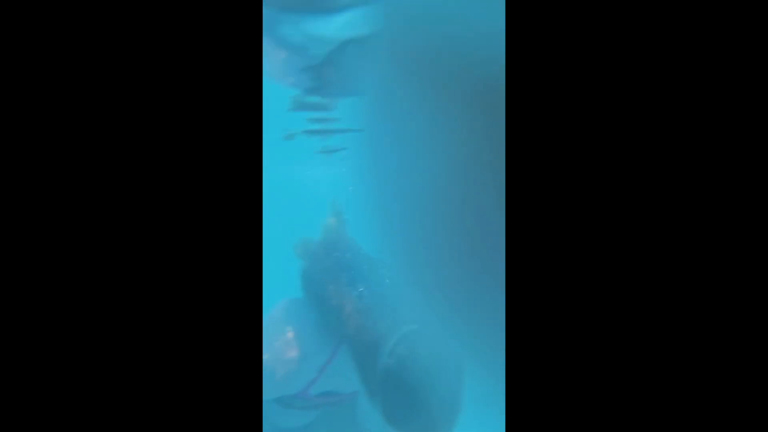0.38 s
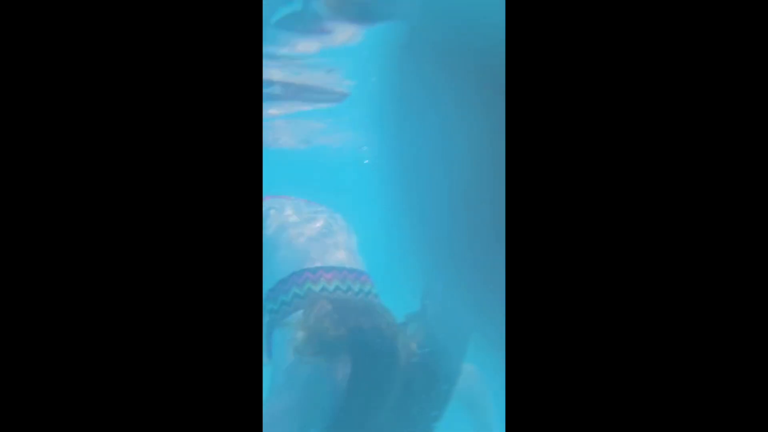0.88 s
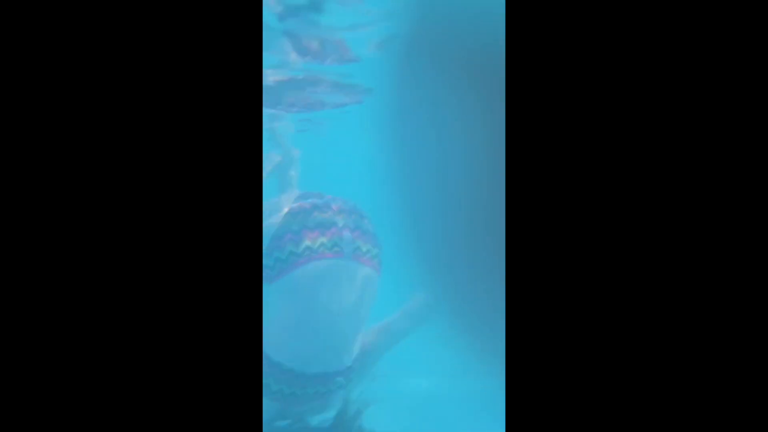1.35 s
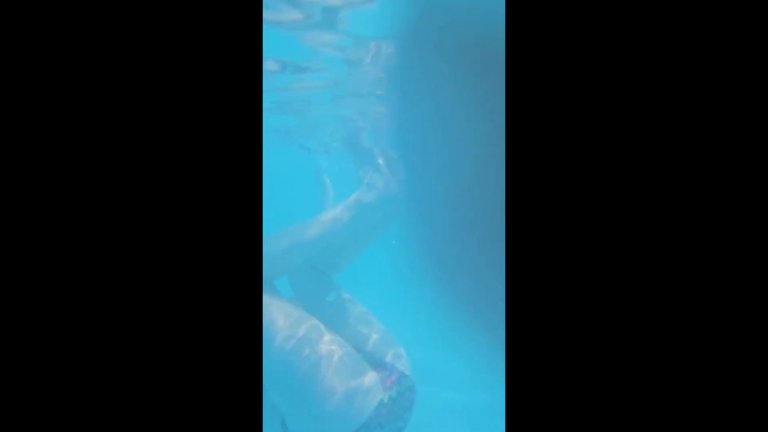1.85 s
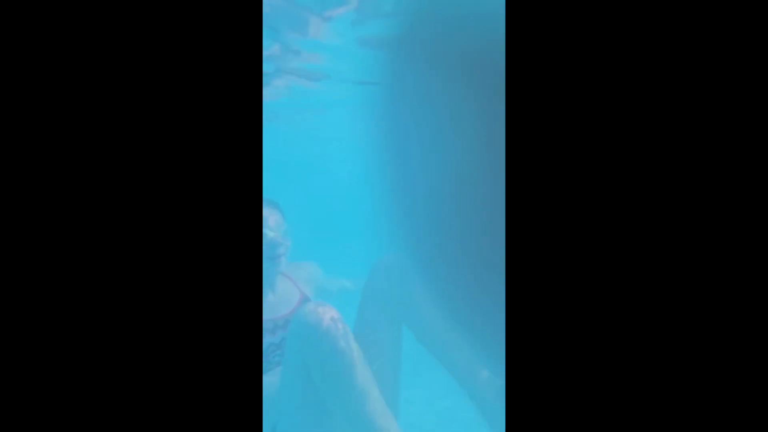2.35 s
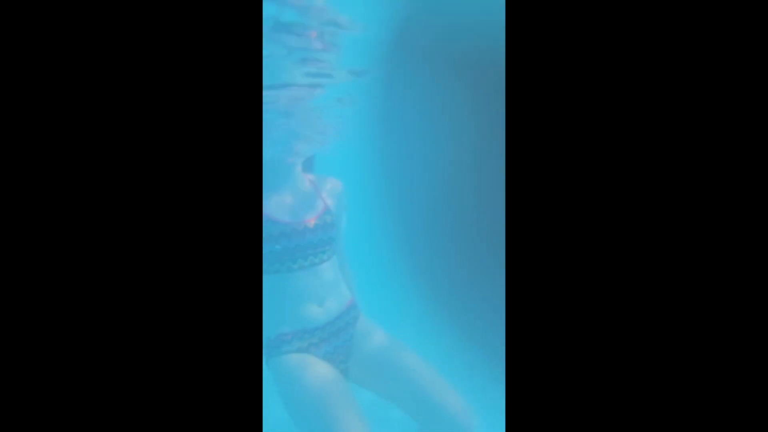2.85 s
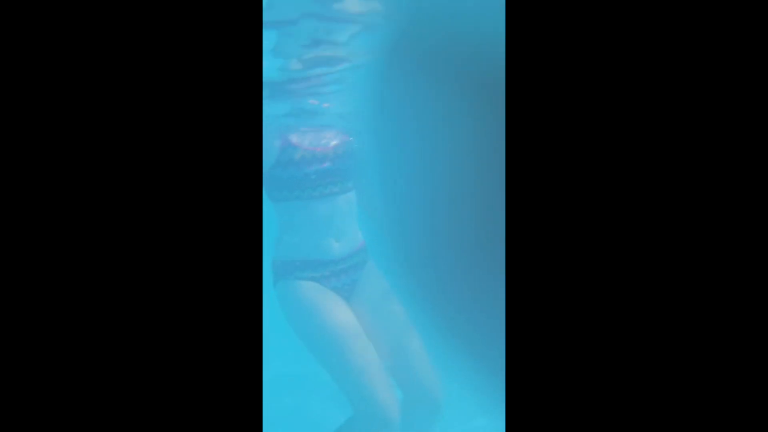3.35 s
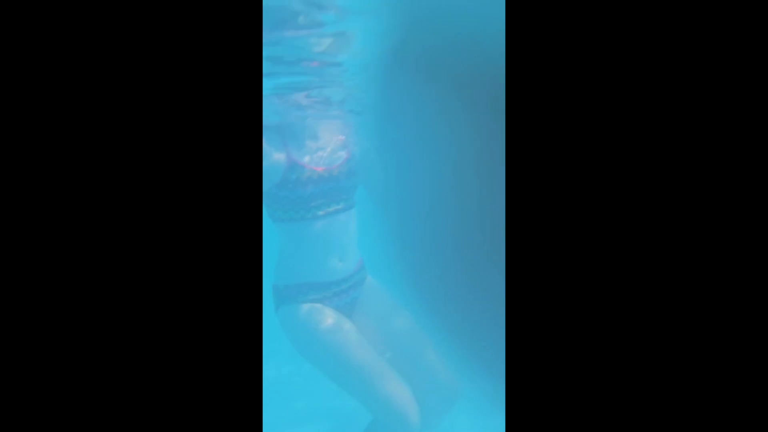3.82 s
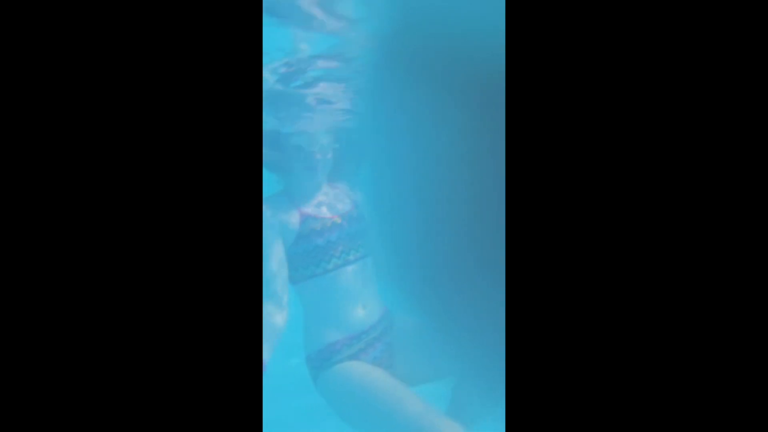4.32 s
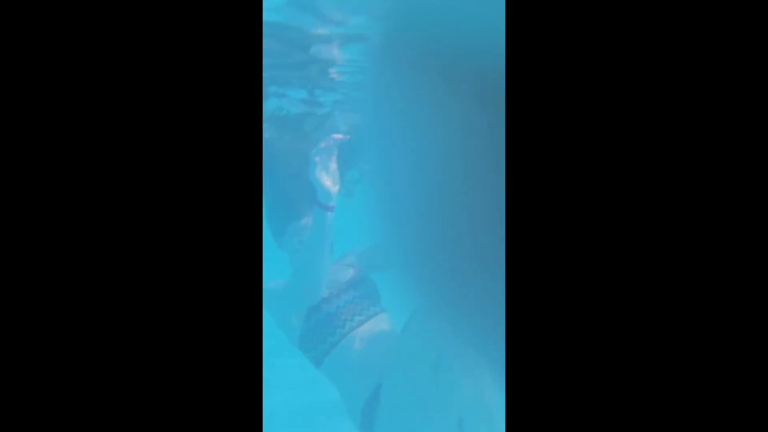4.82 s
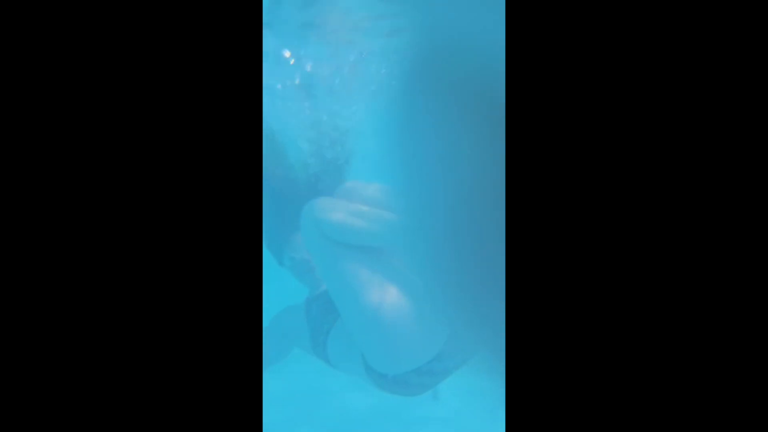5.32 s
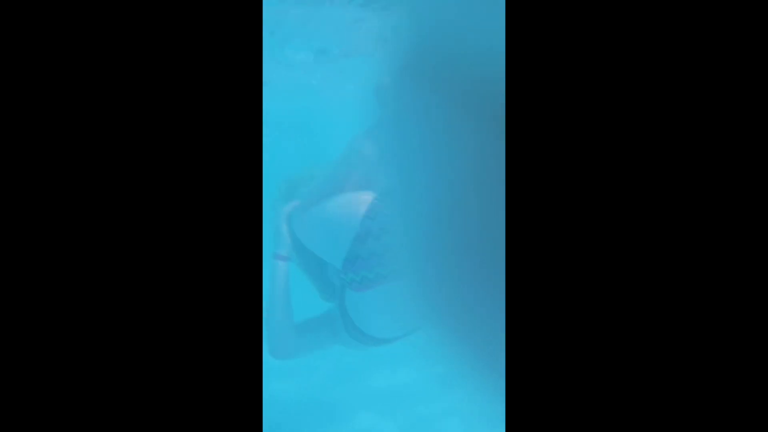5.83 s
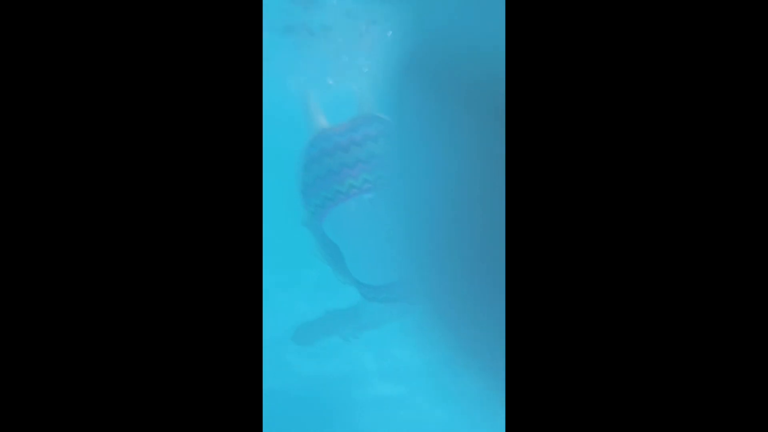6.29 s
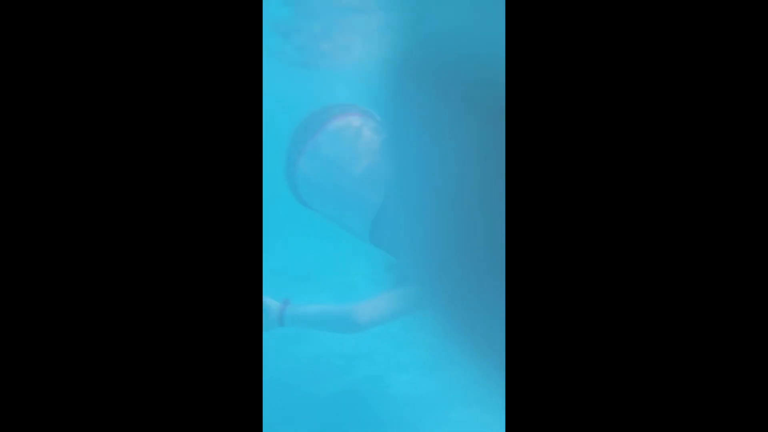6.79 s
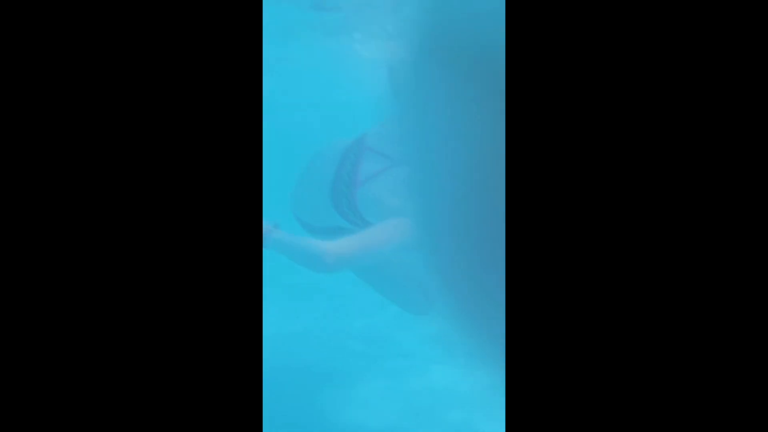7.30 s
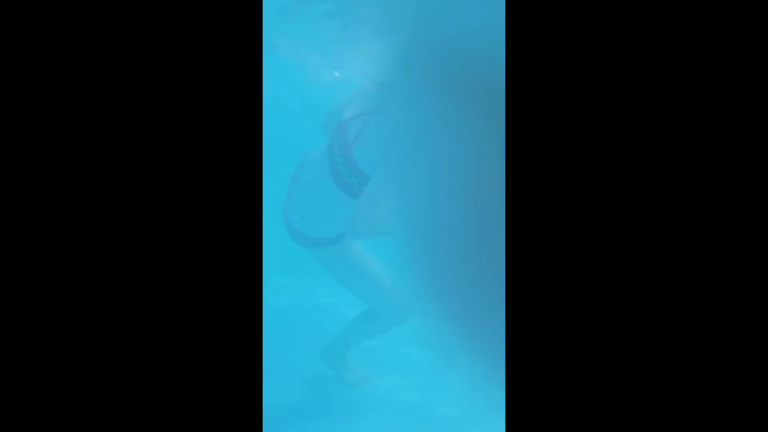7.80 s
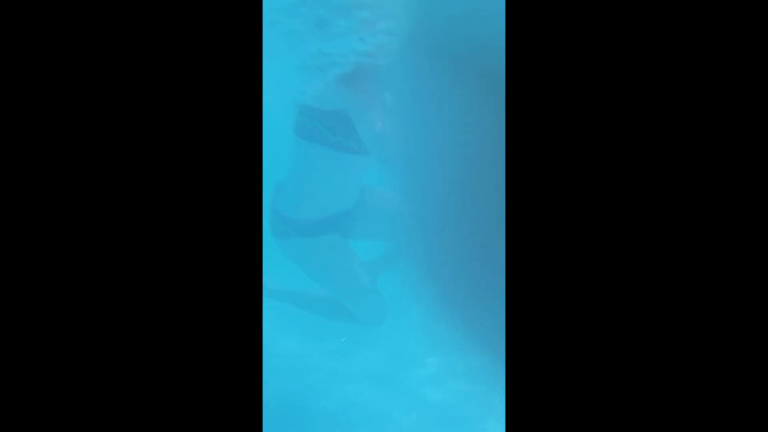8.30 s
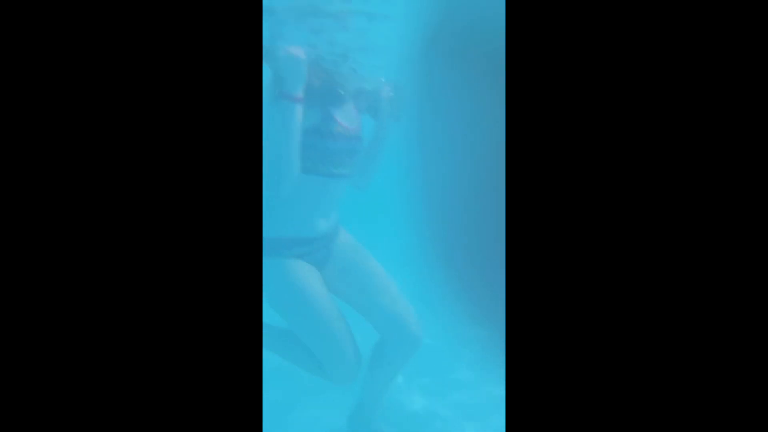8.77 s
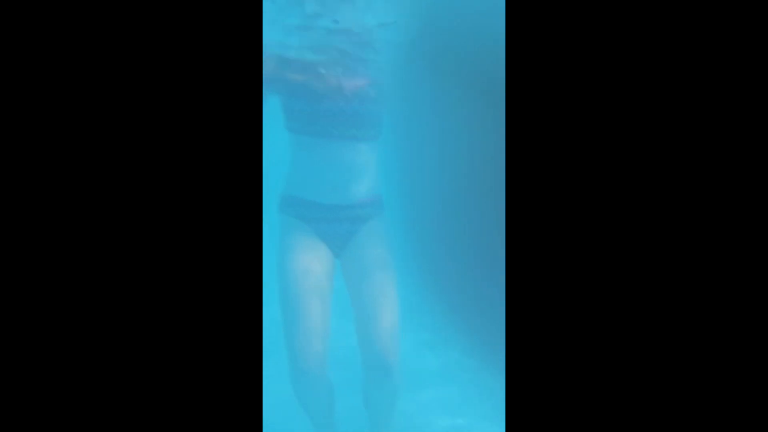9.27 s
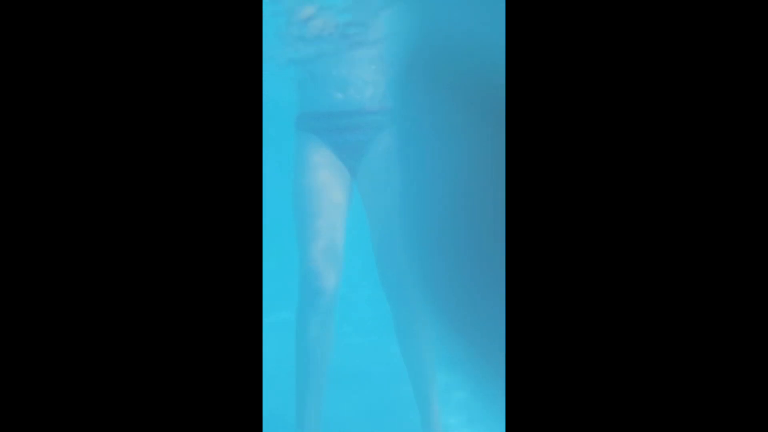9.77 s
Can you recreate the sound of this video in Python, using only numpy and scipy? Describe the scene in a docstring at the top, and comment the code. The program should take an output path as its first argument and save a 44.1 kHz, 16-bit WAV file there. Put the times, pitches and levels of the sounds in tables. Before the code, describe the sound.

Submerged microphone in a pool: deep muffled water rumble, dull thuds on the casing, gurgling bubbles, faint fizz and small clicks.

```python
"""Underwater camera in a pool

A camera is held under water while a swimmer rolls and surfaces nearby. Moving water pushes on the
housing: shaped-noise rumble, dull filtered knocks. Bubbles and fizz, damped air springs and hiss, ring
the right microphone port and leak, weak and mostly inverted, to the left. Glugs ring near the left
microphone, small noise ticks snap on the case, hollow notes follow a few of the knocks."""
import sys
import numpy as np
from scipy import signal
from scipy.fft import rfft, irfft, next_fast_len
from scipy.io import wavfile

SR = 44100
rng = np.random.default_rng(int(sys.argv[2]) if len(sys.argv) > 2 else 0)


def log_audio(samples):
    """Write samples as a 16-bit WAV file to the path given in sys.argv[1]."""
    # one column per channel
    frames = np.atleast_2d(samples).T
    # limit to full scale, then quantise
    limited = np.clip(frames, -1, 1)
    pcm = np.round(limited * 32767).astype(np.int16)
    wavfile.write(sys.argv[1], SR, pcm)


def linear_from_db(decibels):
    """Turn decibels (scalar or array-like) into linear amplitude factors; 0 gives 1."""
    return 10 ** (np.asarray(decibels, float) / 20)


N = 436149


def evened(x):
    """Scale to unit rms."""
    return x / np.sqrt(np.mean(x ** 2) + 1e-20)


def read(points, hz, column=1):
    """One column of a table over log frequency."""
    table = np.transpose(points)
    return np.interp(np.log(hz + 1), np.log(table[0] + 1), table[column])


def curve_db(points, column):
    """One column of a table over time."""
    table = np.transpose(points)
    return np.interp(np.arange(N) / SR, table[0], table[column])


def add(mix, start_s, sound):
    """Add a sound in place, cut at the end of the mix."""
    part = mix[max(round(start_s * SR), 0):][:len(sound)]
    part += sound[:len(part)]


def ring_of(points, stretch=1, size=4096):
    """Causal (minimum-phase) response with the given colour: phase from the log gain."""
    hz = abs(np.fft.fftfreq(size, 1 / SR)) / stretch
    log_gain = np.log(linear_from_db(np.maximum(read(points, hz), -100)))
    spectrum = np.exp(np.conj(signal.hilbert(log_gain)))
    return np.fft.ifft(spectrum).real[:size // 2]


def colour(x, points):
    """Filter to the given colour, at unit rms."""
    return evened(signal.oaconvolve(x, ring_of(points, size=8192))[:N])


def sparse(per_s, spread_db):
    """Impulses at random moments; a few are large."""
    share = rng.random(N) * SR / per_s
    hit = share < 1
    out = np.zeros(N)
    out[hit] = linear_from_db(spread_db * np.minimum(-np.log(share[hit] + 1e-9), 4))
    return out


def bubble(hz, t60_s, rise):
    """A damped air spring whose pitch creeps up, or down if rise is negative."""
    t = np.arange(round(t60_s * SR) + 50) / SR
    turns = hz * t * (1 + rise * t / t60_s)
    onset = (1 - np.exp(-t * hz / 1.2)) ** 2  # the neck closes over about a cycle
    return linear_from_db(-60 * t / t60_s) * onset * np.sin(2 * np.pi * turns)


def swarm(low_hz, high_hz, per_s, spread_db, cycles):
    """Bubbles of 32 sizes at random moments, each size weighted by the root of its pitch."""
    out = np.zeros(N)
    for hz in np.geomspace(low_hz, high_hz, num=32):
        one = bubble(hz, cycles / hz, 0.0059)
        one = np.sqrt(hz) * one / np.linalg.norm(one)
        sizes = evened(sparse(per_s, spread_db))
        for at in np.flatnonzero(sizes):
            add(out, at / SR, sizes[at] * one)
    return evened(out)


def both(right, other, points):
    """Right as given; left through the housing, partly from the other signal."""
    size = next_fast_len(N + SR)
    hz = np.fft.rfftfreq(size, 1 / SR)
    same = np.clip(read(points, hz, column=3), 0, 1)
    leak = same * rfft(right, size) + np.sqrt(1 - same ** 2) * rfft(other, size)
    leak = leak * np.exp(1j * read(points, hz, column=2))
    left = irfft(linear_from_db(read(points, hz)) * leak, size)[:N]
    return np.array([left, right])


def swells():
    """Power of the gurgling swells: an eddy rolling over the housing is a smooth bump."""
    # (time of the top [s], upper rumble level [dB], width at 1/e power [s])
    eddies = [(0.041, -24, 0.095), (0.159, -26.5, 0.044), (0.452, -31, 0.28), (1.183, -43.5, 0.078),
              (2.122, -37, .1), (4.196, -28.5, 0.054), (4.923, -22.5, .15), (5.161, -26.5, .1),
              (5.351, -21, 0.065), (5.752, -28, 0.072), (6.165, -26.5, 0.087), (6.649, -29.5, 0.12),
              (7.311, -26, 0.033), (7.512, -35.5, 0.11), (7.792, -31.5, 0.082), (7.955, -24.5, .12),
              (8.225, -33.5, 0.057), (8.339, -29.5, 0.044), (9.425, -21.5, 0.1), (9.531, -23.5, .15),
              (9.604, -20.5, 0.055), (9.794, -27, 0.11)]
    t = np.arange(0, N + 64, 64) / SR
    power = sum(linear_from_db(2 * db) * np.exp(-(2 * (t - s) / width_s) ** 2) for s, db, width_s in eddies)
    return np.interp(np.arange(N) / SR, t, power)


def rumble():
    """Eddies roll past: smooth noise with lumps in the deep, lumpier pushes above it."""
    # water pushing past the housing: (time [s], deep level [dB], upper level [dB])
    flow = [(0.0, -25, -30.5), (0.47, -33, -32), (0.91, -31, -39.5), (3.5, -30, -41), (3.69, -27, -45.5),
            (4.13, -28.5, -36), (4.82, -16.5, -33.5), (5.18, -32.5, -30), (5.48, -24, -35),
            (6.22, -27, -43), (6.5, -28, -38), (6.88, -22, -37.5), (8.18, -26, -45), (8.56, -27.5, -44),
            (9.01, -26, -39), (9.17, -20.5, -33), (9.61, -36.5, -26), (9.89, -24.5, -23.5)]
    # relative spectra: (frequency [Hz], density [dB per Hz])
    deep_colour = [(8.8, -48), (15, -13), (32, -3.5), (81, 0), (107, -4), (156, -16.5), (198, -17),
                   (250, -36.5), (320, -68.5), (550, -120)]
    upper_colour = [(53, -36.5), (90, 0.5), (171, -0.5), (263, -11.5), (329, -19), (394, -23.5),
                    (518, -47.5), (700, -42.5), (910, -68), (1540, -120)]
    swell_deep_db = 3  # swell in the deep over swell above
    deep = colour(rng.standard_normal(N) + 0.77 * evened(sparse(44, 3.4)), deep_colour)
    upper = colour(.7 * rng.standard_normal(N) + evened(sparse(50, 3.6)), upper_colour)
    swell = swells()
    deep_power = linear_from_db(2 * curve_db(flow, column=1)) + linear_from_db(2 * swell_deep_db) * swell
    upper_power = linear_from_db(2 * curve_db(flow, column=2)) + swell
    return np.sqrt(deep_power) * deep + np.sqrt(upper_power) * upper


def clumps():
    """Bubbles drift past in clouds: a slow random level in dB."""
    step_s, window_s, rms_db = .004, .12, 1.7
    t = np.arange(0, N / SR + 1, step_s)
    slow = np.convolve(rng.standard_normal(len(t)), np.hanning(round(window_s / step_s)), "same")
    return rms_db * np.interp(np.arange(N) / SR, t, evened(slow))


def air_db(column):
    """Level of bubbling (1) or spray (2): slow curve plus splashes, then random clouds."""
    # air in the water, before the port gain: (time [s], bubbling level [dB], fine spray level [dB])
    air = [(0, -49.5, -70), (.3, -53, -74.5), (.88, -60.5, -76.5), (1.24, -54, -79.5), (2.18, -43, -70),
           (2.78, -49.5, -77.5), (3.28, -49, -77.5), (3.52, -44.5, -71), (3.8, -45.5, -75),
           (4.13, -50.5, -75), (4.7, -44.5, -71), (5.34, -43.5, -76), (5.59, -47, -72.5),
           (6.28, -41.5, -77.5), (6.75, -44.5, -75.5), (7.1, -40.5, -79.5), (7.49, -46.5, -77),
           (8.1, -41, -77), (8.51, -45.5, -71.5), (8.87, -48.5, -76.5), (9.2, -44.5, -76),
           (9.89, -39.5, -78.5)]
    # a body breaks the surface, before the port gain:
    # (start [s], length [s], bubbling level [dB], fine spray level [dB])
    splashes = [(0.118, 0.036, -50, -64.5), (0.413, .12, -51, -73.5), (4.806, 0.35, -37.5, -63.5),
                (6.082, .24, -42, -79.5), (7.754, 0.088, -40, -67.5), (9.224, 0.36, -33.5, -64.5)]
    rise_share, fade_s = .45, .045  # build-up as share of length; time constant of power
    t = np.arange(N) / SR
    power = linear_from_db(2 * curve_db(air, column))
    for row in splashes:
        start_s, length_s = row[:2]
        rise = np.clip((t - start_s) / (rise_share * length_s), 0, 1)
        fade = np.exp(-np.maximum(t - start_s - length_s, 0) / fade_s)
        power = power + linear_from_db(2 * row[column + 1]) * rise * fade
    return 10 * np.log10(power) + clumps()


def fizz():
    """Tiny bubbles and crackle speckle a thin hiss; the harder the spray, the brighter it gets."""
    # relative spectrum: (frequency [Hz], density [dB per Hz])
    fizz_colour = [(2600, 11), (3300, 19), (4000, 10), (5600, 5), (6400, 6.5), (8700, 6), (9700, -86),
                   (10700, -26), (12400, -18), (13600, -23.5), (15400, -17), (17000, -15.5)]
    spray_db = air_db(column=2)
    bursts = np.convolve(sparse(60, 3.5), np.exp(-np.arange(300) / 50))[:N]
    crackle = evened(bursts * rng.standard_normal(N))
    tiny = swarm(2800, 7500, 7.7, 7.2, 77)
    hiss = colour(rng.standard_normal(N) + 0.43 * tiny + 0.23 * crackle, fizz_colour)
    dull = np.convolve(hiss, signal.firwin(63, 9500, fs=SR), "same")
    top_db = .9 * (spray_db + 76)
    return linear_from_db(spray_db) * (dull + linear_from_db(top_db) * (hiss - dull))


def bubbling():
    """Small bubbles and soft pops in a wash, through the port; in a surge they merge into a rush."""
    # relative spectrum of the port: (frequency [Hz], density [dB per Hz])
    port_colour = [(250, -26), (400, -9.5), (560, -14.5), (700, -10.5), (880, -10), (1000, -1), (1150, 0.5),
                   (1380, -7.5), (1580, -15), (2070, -16), (2360, -28), (2800, -30), (3300, -33.5),
                   (4300, -67)]
    level = linear_from_db(air_db(column=1))
    bursts = np.convolve(sparse(14, 2.5), np.exp(-np.arange(3000) / 800))[:N]
    pops = evened(bursts * rng.standard_normal(N))
    apart = np.clip((linear_from_db(-47) / level) ** 0.42, .6, 1.4)  # weight of separate bubbles
    single = colour(0.34 * swarm(380.4, 3616, 12, 4.7, 110) + .5 * pops, port_colour)
    rush = colour(rng.standard_normal(N), port_colour)
    return level * (rush + 1.81 * apart * single) / np.sqrt(1 + (1.14 * apart) ** 2)


def glugs():
    """Large pockets of air ring low and long, wobbling as they change shape."""
    # (time [s], level before wobble and side gain [dB], starting pitch [Hz])
    pockets = [(0.812, -36, 301.6), (0.855, -33.5, 285), (.901, -33, 317), (1.074, -33.5, 341),
               (1.206, -30.5, 365), (1.271, -29, 364), (1.723, -34.5, 352), (1.782, -34, 340),
               (1.93, -32, 323), (2.184, -38.5, 450), (2.351, -38, 437), (2.394, -35, 388),
               (4.07, -37.5, 293), (5.153, -25.5, 391), (5.358, -39, 360), (5.891, -19.5, 820),
               (6.793, -44, 435), (7.24, -26.5, 676), (8.33, -46, 298), (8.392, -29.5, 850)]
    out = np.zeros(N)
    for s, db, hz in pockets:
        add(out, s, linear_from_db(db) * bubble(hz, 75 / hz, 0.0054))
    wobble = evened(signal.oaconvolve(rng.standard_normal(N), np.hanning(700), "same"))
    return out * (.8 + .5 * wobble)


def ticks():
    """Snaps of decaying noise, a different scratch at each microphone; each also rings the port."""
    # (time [s], left snap peak [dB], port ring peak before port gain [dB],
    #  gain above 9.5 kHz before the peak is set [dB])
    hits = [(0.0277, -27.5, -30, 5.5), (0.1084, -43.5, -34.5, -12.5), (0.1278, -36.5, -40, -10),
            (0.1422, -42.5, -23.5, 12.5), (0.169, -24.5, -7.5, 4), (.1836, -44, -33.5, -5.5),
            (0.2824, -45, -32, -3.5), (0.4259, -46, -33, 1.5), (0.4431, -34, -15.5, 7),
            (0.4703, -47, -26, 11.5), (0.4923, -53, -44, 22.5), (0.519, -35, -22, 17.5),
            (0.5296, -37.5, -34, -9.5), (0.6907, -46.5, -53, -27), (1.8049, -46.5, -51.5, 9),
            (2.473, -56.5, -34.5, -28.5), (2.739, -54.5, -41.5, -20.5), (3.4988, -47, -38, 1.5),
            (3.865, -50.5, -52, -12), (4.5346, -48.5, -29.5, 0.5), (4.9298, -43.5, -21, -10.5),
            (4.988, -47.5, -23.5, -5), (5.0355, -42.5, -15, -5), (5.113, -46.5, -33, 1),
            (5.152, -44.5, -32.5, -5), (5.0826, -43.5, -24.5, -8.5), (5.0987, -49.5, -35.5, 3.5),
            (5.5295, -42, -36.5, -3.5), (5.668, -45.5, -49, -0.5), (6.8121, -47.5, -41.5, -14),
            (6.848, -49.5, -39.5, -5), (7.772, -55, -33, -10), (7.793, -47.5, -21.5, 4),
            (7.8155, -34.5, -33.5, -11.5), (7.9179, -38, -17.5, -21), (8.5655, -65, -26.5, -9),
            (8.579, -50, -16.5, -12), (9.21, -51.5, -36, 7.5), (9.491, -36, -29, 0),
            (9.535, -59.5, -36, -14)]
    # relative spectra of snap and port ring: (frequency [Hz], gain [dB])
    snap_colour = [(1800, -15.5), (3200, 9.5), (4200, 2.5), (7500, 0.5), (9800, -7), (11600, 3),
                   (13700, -13), (15500, -2), (17500, -60)]
    crack_colour = [(400, -27.5), (800, -2.5), (1150, -3), (1700, -1.5), (2300, -12.5), (2900, -19),
                    (3600, -36), (6000, -75.5)]
    snaps, port = np.zeros((2, N)), np.zeros(N)
    t = np.arange(400) / SR
    low = signal.firwin(63, 9500, fs=SR)
    for s, db, port_db, top_db in hits:
        noise = rng.standard_normal((3, 400))
        for side, scratch, side_db in zip(snaps, noise, (0, 3)):  # left, right
            snap = np.convolve(scratch * np.exp(-t / 0.0017), ring_of(snap_colour, size=1024))
            dull = np.convolve(snap, low, "same")
            snap = dull + linear_from_db(top_db) * (snap - dull)
            add(side, s, linear_from_db(db + side_db) * snap / abs(snap).max())
        rung = np.convolve(noise[2] * np.exp(-t / 0.0028), ring_of(crack_colour))
        add(port, s, linear_from_db(port_db) * rung / abs(rung).max())
    return snaps, port


def rings():
    """Air trapped in the housing rings after some knocks: short hollow notes, sinking slightly."""
    # (time [s], level [dB], starting pitch [Hz])
    notes = [(2.551, -18, 832), (2.624, -16, 740), (2.699, -23, 740), (3.729, -25, 770), (3.802, -18, 745),
             (6.371, -25, 636)]
    out = np.zeros(N)
    for s, db, hz in notes:
        add(out, s, linear_from_db(db) * bubble(hz, t60_s=0.045, rise=-.027))
    return out


def big_bubbles():
    """Single large bubbles at the port that stand out; the higher the pitch, the shorter."""
    # (time [s], level before port gain [dB], starting pitch [Hz])
    singles = [(.05, -29, 800), (0.18, -24, 1040), (.345, -38, 1050), (0.459, -34, 1030), (.553, -33, 1075),
               (.856, -28, 1082), (0.891, -31.5, 875), (0.924, -39, 1330), (1.075, -38, 810),
               (1.167, -32, 887), (1.194, -27.5, 1040), (1.204, -25, 780), (1.265, -29, 1230),
               (1.33, -32, 1710), (1.43, -35, 2090), (1.535, -34, 1085), (2.153, -22, 1080),
               (2.69, -36.5, 2130), (2.772, -31.5, 705), (3.154, -27.5, 1345), (3.966, -29, 1124),
               (4.547, -24.5, 1133), (4.727, -17, 1082), (4.765, -17, 1209), (5.042, -15.5, 1155),
               (5.075, -18, 1400), (5.208, -19, 1292), (5.257, -23, 1157), (5.701, -23.5, 1003),
               (5.722, -23, 1165), (6.187, -26.5, 1070), (6.417, -20, 1148), (6.489, -23, 1027),
               (7.263, -20.5, 1043), (7.57, -24, 997), (7.917, -19, 1283), (8.071, -7.5, 1150),
               (8.324, -21, 1180), (8.339, -21, 1424), (8.371, -20.5, 1044), (8.604, -21, 1120),
               (8.581, -21, 1243), (8.666, -18, 1075), (8.728, -26.5, 1450), (8.876, -25.5, 1170),
               (9.095, -25.5, 1066), (9.35, -25.5, 1100), (9.405, -18.5, 1280), (9.508, -20.5, 1043),
               (9.557, -16, 1348), (9.727, -21.5, 1180), (9.794, -21.5, 1202)]
    out = np.zeros(N)
    for s, db, hz in singles:
        add(out, s, linear_from_db(db) * bubble(hz, 52 / hz, .006))
    return out


def knocks():
    """Each push on the housing gives a short dull thud, its spectrum scaled to the pitch."""
    # (time before the pitch-dependent delay [s], peak level [dB], pitch [Hz])
    pushes = [(.028, -1, 156.4), (0.166, 4, 140.8), (.376, -17.5, 160.4), (.429, -12, 153.7),
              (.443, -7, 183.5), (.454, -6.5, 171), (.472, -12.5, 134.8), (0.515, -8, 182), (.544, -1, 183),
              (.574, -7, 163), (0.616, -11, 148.4), (.854, -21.5, 188.3), (2.135, -22.5, 144.7),
              (2.5497, -2.5, 181), (2.622, -3, 174.2), (2.668, -17, 120.2), (2.6977, -6, 177.4),
              (2.948, -8.5, 159.2), (3.031, -9.5, 158.5), (3.492, -12, 146), (3.574, -15, 119),
              (3.728, -2.5, 166.6), (3.801, -2, 177.4), (3.898, -11, 155.7), (4.149, -12.5, 113.3),
              (4.189, -12.5, 169), (4.411, -12.5, 140.6), (4.493, -13.5, 125), (4.566, -9, 114),
              (4.627, -16, 111.8), (4.666, -11.5, 134.7), (4.81, -22.5, 152.5), (4.868, -14.5, 160),
              (4.91, -17, 131.6), (5.698, -8.5, 148), (5.83, -12.5, 145), (5.957, -11.5, 110.9),
              (6.076, -11, 114.6), (6.168, -10.5, 173.8), (6.239, -5, 161.7), (6.304, -5.5, 152.5),
              (6.371, -6.5, 170.8), (6.451, -13, 164.5), (6.595, -19, 186.4), (6.758, -13.5, 125.1),
              (7.086, -8, 119.8), (7.282, -8.5, 153.2), (7.781, -10, 111.2), (7.953, -12.5, 157),
              (8.443, -14, 121.6), (9.008, -3, 116.4), (9.093, -6.5, 172), (9.25, -18.5, 170.5),
              (9.387, -17, 125.6), (9.425, -21, 113), (9.597, -7.5, 162.7)]
    # relative spectrum at the reference pitch: (frequency [Hz], gain [dB])
    knock_colour = [(24, -18.5), (40, -6.5), (211, 4.5), (518, -22.5), (812, -32), (1020, -41),
                    (1130, -51.5), (1250, -40.5), (2140, -47), (2500, -70.5), (3250, -100), (5500, -120)]
    reference_hz = 178
    thud = np.zeros(N)
    for s, db, hz in pushes:
        # all-pass: the wall yields slowly, so lows arrive late
        lag = np.exp(-2 * np.pi * .3 * hz / SR)
        swing = signal.lfilter([lag, -1], [1, -lag], ring_of(knock_colour, hz / reference_hz))
        delay_s = .0018 * (reference_hz / hz) ** 2.5  # a lower-pitched thud starts later
        add(thud, s + delay_s, linear_from_db(db) * swing / abs(swing).max())
    return thud


def scene():
    """Housing sounds reach both microphones much alike; port sounds favour the open right port."""
    # left against right: (frequency [Hz], level [dB], phase ahead [rad], likeness [0-1])
    housing_left = [(25, 2.5, -.38, 1), (60, 1.5, -.2, 1), (150, 1.1, 0, 1), (300, 1.6, .2, 1),
                    (600, 3, .3, .95)]
    port_left = [(400, 0, 3.1, .8), (650, -5, 3.3, .75), (870, -11, 3.2, .7), (1180, -19, 3.8, .95),
                 (1550, -17, 4.1, .7), (2100, -21, 2.2, .5), (2700, -12, 2.4, .6), (3200, -4, 5.5, .6),
                 (4500, -3, 5.5, .25), (12000, -7, 5.5, .25)]
    port_gain_db = 6
    snaps, rung = ticks()
    housing = rumble() + knocks() + rings()
    loud = big_bubbles() + rung
    # two draws of the wash around the same loud bubbles
    port, other = (linear_from_db(port_gain_db) * (bubbling() + fizz() + loud) for _ in range(2))
    near_left = glugs() * linear_from_db([[3], [-3]])
    return both(housing, housing, housing_left) + both(port, other, port_left) + snaps + near_left


def roll_off(x):
    """The treble ends steeply here."""
    return signal.sosfilt(signal.butter(12, 15830, fs=SR, output="sos"), x)


def record(dry):
    """A soft ceiling rounds off the peaks."""
    mix = 1.1 * np.tanh(dry / 1.1)
    return roll_off(mix)


dry = scene()
out = record(dry)
log_audio(out)
```